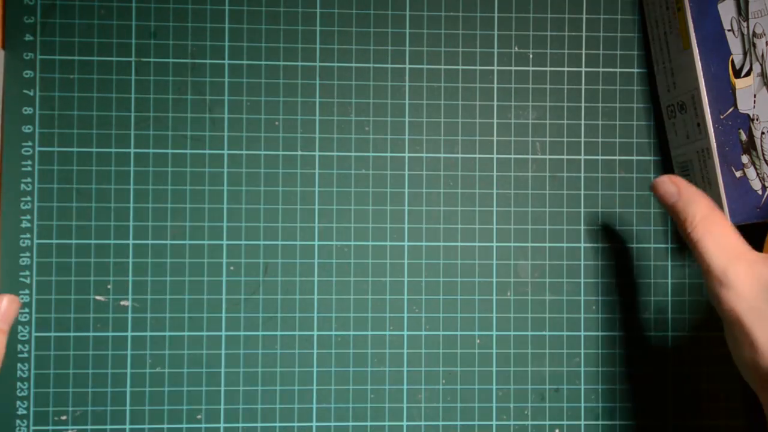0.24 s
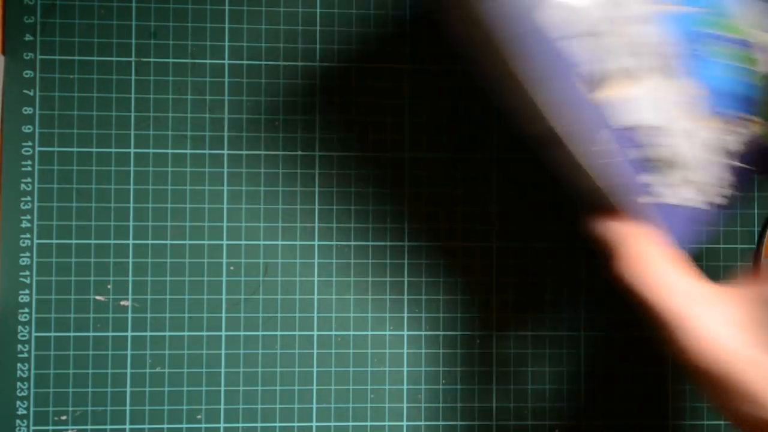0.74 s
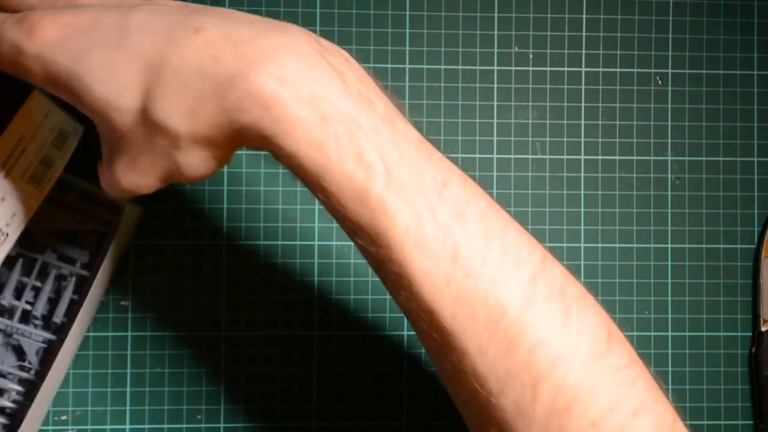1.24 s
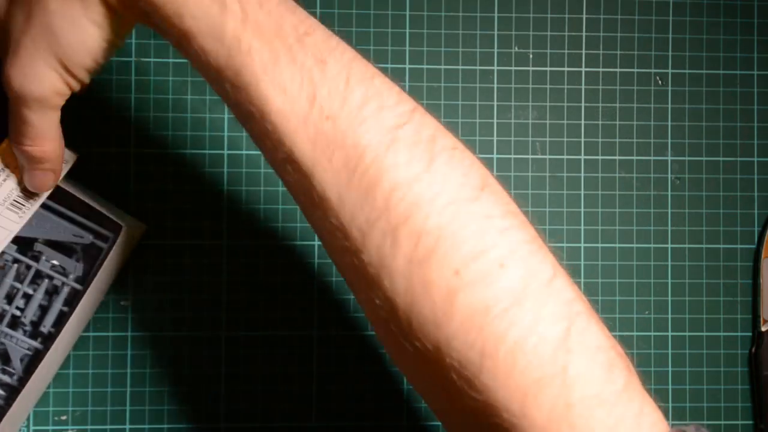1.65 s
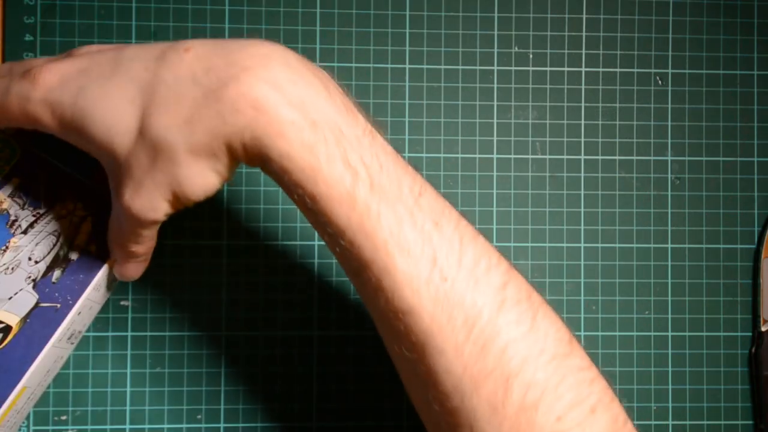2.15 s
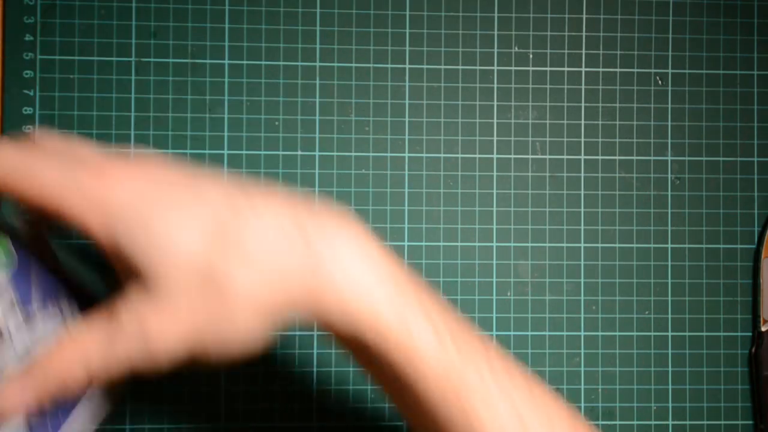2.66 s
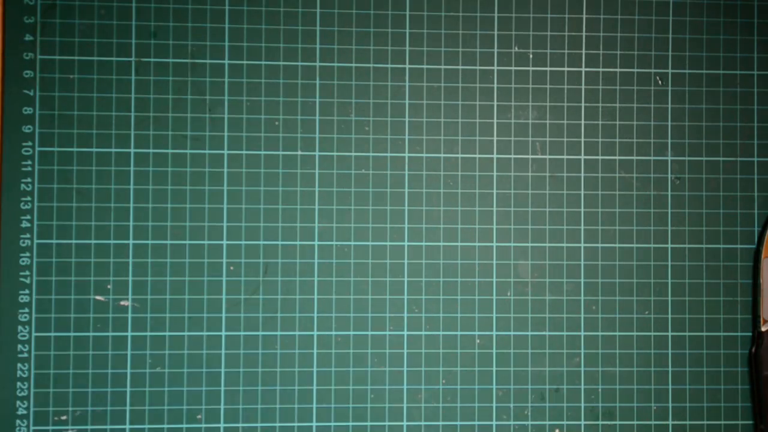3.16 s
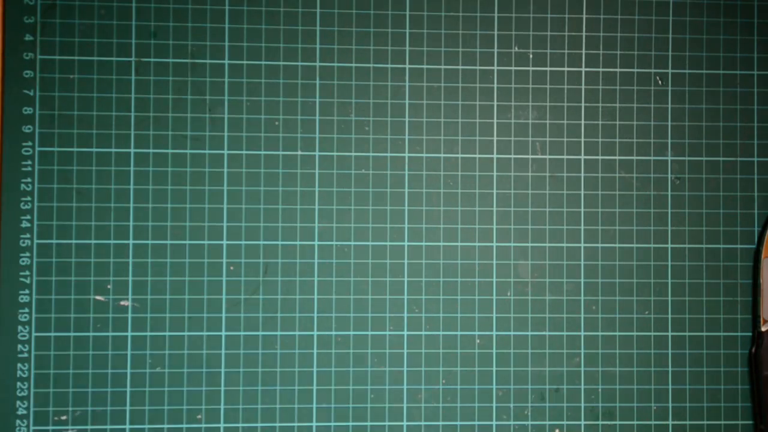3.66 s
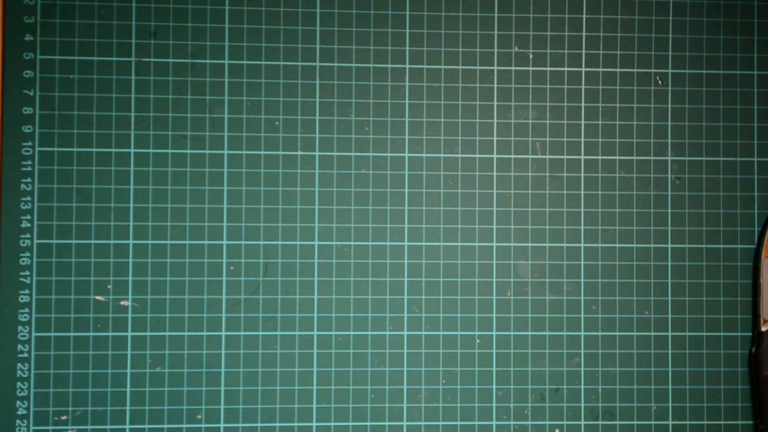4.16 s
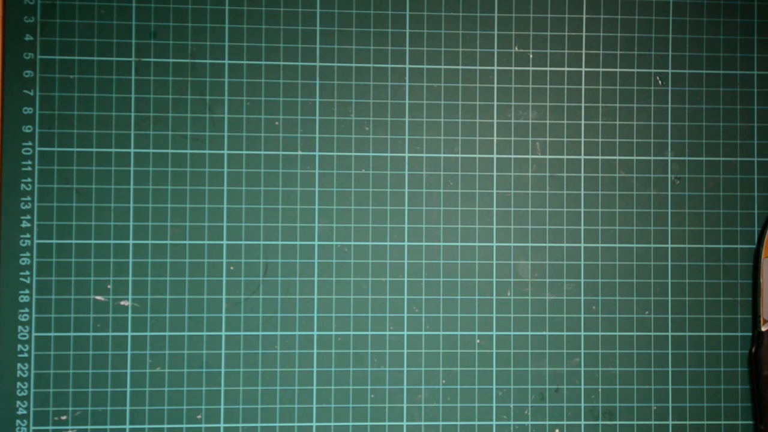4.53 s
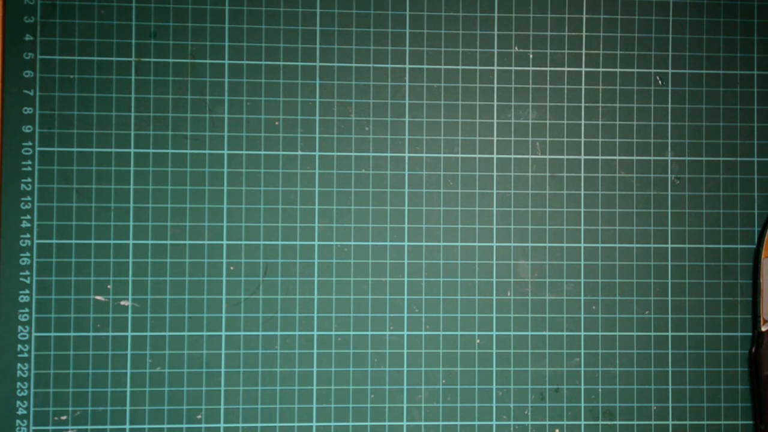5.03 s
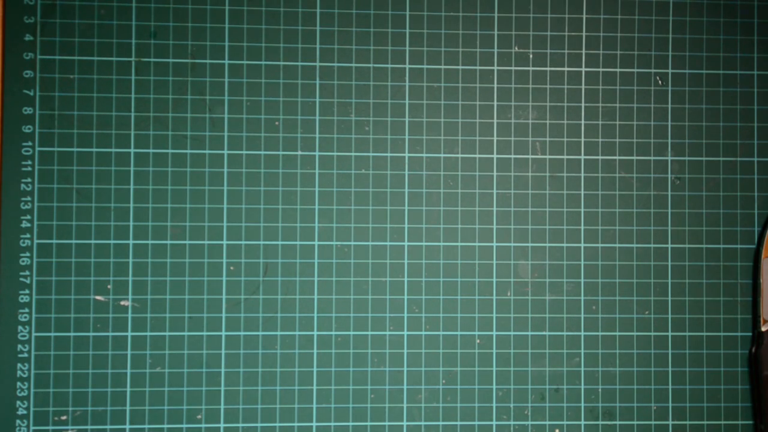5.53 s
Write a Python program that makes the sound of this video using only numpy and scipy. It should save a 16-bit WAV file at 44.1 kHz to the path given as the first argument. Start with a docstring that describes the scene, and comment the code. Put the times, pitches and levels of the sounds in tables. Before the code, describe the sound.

Very close, dry sound of hands moving a cardboard box of loose plastic pieces over a cutting mat. A short bright clatter comes first, then a click, then the loudest burst of hard cracks, boxy booms and rattling, slightly overloaded. Gentler card rubbing follows, another snap and scrape as the box leaves, then separate muffled shuffles and light knocks over faint room noise.

```python
"""At a table in a quiet room, a cardboard box of plastic model parts is lifted, opened, shut and put away.
Knocks: a short blow and a dying flurry of contacts make the box boom, its walls clack and the parts rattle.
Rubbing: dense random slips of card on card and mat drive the box, the fibres, the loose parts and the table.
Soft bumps ring the table top; a short room tail and steady noise lie below.
The close microphone notches the treble, and the hardest peaks clip."""
import sys
import numpy as np
from scipy import signal
from scipy.fft import rfft, irfft
from scipy.io import wavfile

SR = 44100
rng = np.random.default_rng(int(sys.argv[2]) if len(sys.argv) > 2 else 0)


def store_wav(level_fs):
    """Save 16-bit WAV to argv[1]."""
    pcm = np.round(np.clip(np.atleast_2d(level_fs), -1, 1) * 32767)
    wavfile.write(sys.argv[1], SR, pcm.T.astype(np.int16))


N = 254962

# Knocks and short scrapes, levels before each layer's own gain:
# [t/s, clack level/dB, boom re clack/dB, rattle re clack/dB, f of the piece hit/Hz, dying time/s]
KNOCK_EVENTS = [(0.002, -28, -6, 4, 7700, .005), (.019, -27, -8, 14.5, 4630, 0.0034),
                (0.028, -26, -11.5, 11.5, 8250, 0.0038), (0.05, -27.5, -13, 6.5, 5160, 0.01),
                (0.119, -31, -33, 9, 7600, 0.016), (.155, -25.5, -30, 4.5, 4630, 0.0094),
                (.17, -29.5, -30, 4, 7900, 0.011), (.2, -36, -8, -2, 10300, 0.0053),
                (.213, -28.5, -19, 1, 4970, 0.0088), (.239, -58, 7, 9, 8160, 0.0048),
                (.254, -36, -27, 7.5, 3040, 0.0054), (0.323, -62, -1, 16, 8450, 0.0054),
                (.349, -60, -5, 8, 6500, .006), (0.383, -45, 3, -10, 2290, 0.018),
                (.406, -35.5, 0.5, -8, 1360, 0.0091), (0.419, -32, -4, -6, 1030, 0.0061),
                (.55, -15, -20, -7.5, 2390, 0.0067), (0.66, -40, -30, -7.5, 1780, 0.015),
                (.796, -25, -9, -10.5, 1460, 0.011), (.874, -27, 0, -2.5, 2060, .0095),
                (.927, -24.5, -6.5, -1, 3900, 0.0037), (.9335, -5.5, -12.5, -4.5, 7300, 0.0057),
                (.942, -9, -0.8, -10, 1550, 0.0082), (0.977, -21.5, -10.5, 0, 1380, 0.0064),
                (1.069, -21.5, -20, -8.5, 3570, 0.017), (1.169, -3, 6.5, -9, 1257, 0.0084),
                (1.183, -10.5, 11.5, -4, 1460, 0.0065), (1.244, -19.5, -12, -6, 1160, 0.01),
                (1.284, -15.5, 4, -10, 1126, 0.0054), (1.309, -21, -16, -5.5, 2640, 0.0069),
                (1.334, -37.5, 25, -18, 1120, 0.0045), (1.355, -28, -16, -20, 2160, .011),
                (1.395, -33, 2, -8, 2400, .007), (1.479, -21, -0.5, -10, 2740, 0.0074),
                (1.559, -32.5, 9, -7.5, 1090, 0.022), (1.63, -27, 7.5, -7.5, 1620, 0.015),
                (1.653, -26.5, 10.5, -3, 1750, 0.0061), (1.746, -39, -14, -3.5, 2880, 0.0076),
                (1.844, -52, -2.5, -0.5, 2450, 0.016), (1.983, -37.5, 5, -11, 2230, 0.0064),
                (2.081, -32, 10.5, 0.5, 2150, 0.0077), (2.202, -33.5, 12, -5, 1470, 0.0066),
                (2.426, -45, 3, 1.5, 2600, 0.013), (2.495, -42.5, 8, -2, 2400, 0.011),
                (2.73, -43, -2, -10, 1210, 0.011), (2.753, -35, 8, -7, 1520, 0.0056),
                (2.785, -21, 0, -2, 1454, 0.018), (2.834, -27.5, 4, -1, 1180, 0.0098),
                (2.984, -12.5, 9, -9, 6260, 0.008), (3.005, -27, -2, 6.5, 7500, 0.011),
                (3.045, -42.5, 19.5, -9, 1580, 0.0049), (3.168, -30, 15, -9, 1100, 0.0069),
                (3.233, -32.5, 2, 1, 1130, 0.0078), (3.31, -19.5, 0, -4, 1147, 0.018),
                (3.453, -38.5, 6, -22, 2430, 0.0061), (3.533, -35, 14, -8, 2500, 0.0055),
                (3.752, -52.5, 19.5, -13, 1490, .005), (4.148, -34, -10, -4, 1470, 0.028),
                (4.357, -31.5, 17.5, 4.5, 7500, 0.014), (4.379, -20, 5.5, -8, 1420, 0.012),
                (4.464, -45, 22.5, 3, 1140, 0.012), (4.485, -33, 20.5, -5, 1510, .009),
                (4.519, -28.5, 10.5, -12.5, 1970, 0.023), (4.554, -35.5, 7.5, -15, 1510, 0.024),
                (4.929, -51.5, -30, 2.5, 4400, 0.017), (4.982, -45.5, -18, -22, 1540, 0.0092),
                (5.007, -48.5, -3, -1.5, 7540, .005), (5.066, -47.5, -1, -3.5, 2260, 0.015),
                (5.469, -53, 12.5, 10, 7900, .015), (5.492, -35, 12.5, -2, 1940, 0.0083),
                (5.504, -38, 11, -14, 2100, .018), (5.571, -35.5, 8.5, -2.5, 1250, 0.022),
                (5.657, -44, 17, 3.5, 1250, 0.011)]
# Colour of rubbed fibres and rattling parts: [f/Hz, relative level per Hz/dB]
RUSTLE_COLOUR = [(2200, -22.5), (3300, -0.5), (4830, 0), (6300, -2), (8400, -4), (10000, -14.5),
                 (12000, -40.5), (15500, -13.5)]
# Colour of the thud in the table: [f/Hz, relative level per Hz/dB]
TABLE_COLOUR = [(20, -28.5), (60, -30.5), (95, -15), (125, -8), (200, -11.5), (260, -5.5), (320, 1),
                (370, -6), (450, -3), (620, -13), (1060, -66.5)]
LID_SHUT_S = 2.7


def from_db(db):
    """Decibels to gain."""
    return 10 ** (np.asarray(db) / 20)


def rms_one(x):
    """Scale to unit rms."""
    return x / np.sqrt(np.mean(x ** 2) + 1e-20)


def resonate(x, hz, width_hz):
    """Two-pole resonance with gain 1 near its peak; a narrow width rings longer."""
    r = np.exp(-np.pi * width_hz / SR)
    feedback = [1, -2 * r * np.cos(2 * np.pi * hz / SR), r * r]
    return signal.lfilter([(1 - r * r) / 2, 0, (r * r - 1) / 2], feedback, x)


def mode_kernel(modes):
    """Impulse response of parallel modes with alternating signs; unit energy."""
    click = np.eye(1, 4096)[0]
    h = np.zeros(4096)
    for k, (hz, width_hz, db) in enumerate(modes):
        h += (-1) ** k * from_db(db) * resonate(click, hz, width_hz)
    return h / np.linalg.norm(h)


def colour_kernel(spectrum):
    """Causal (minimum-phase) impulse response of a smooth spectrum; unit energy."""
    hz, db = np.transpose(spectrum)
    bins_hz = np.fft.rfftfreq(8192, 1 / SR)
    log_gain = np.interp(np.log(bins_hz + 1), np.log(hz), db) * np.log(10) / 20
    cepstrum = irfft(log_gain)
    # fold the second half onto the first: all energy comes as early as it can
    cepstrum[1:4096] *= 2
    cepstrum[4097:] = 0
    h = irfft(np.exp(rfft(cepstrum)))[:4096]
    return h / np.linalg.norm(h)


def through(x, kernel):
    """Convolve, keeping the length."""
    return signal.fftconvolve(x, kernel)[:len(x)]


def grains(per_s, spread_db, size):
    """Random micro-contacts of uneven strength and either sign; unit rms."""
    strength_db = spread_db * np.minimum(rng.exponential(1, size), 4)
    strength = from_db(strength_db) * rng.choice([-1, 1], size)
    return rms_one(strength * (rng.random(size) < per_s / SR))


def flutter(rate_hz, depth_db):
    """Uneven grip: a random gain that wanders at about rate_hz, depth_db being its rms."""
    r = np.exp(-2 * np.pi * rate_hz / SR)
    wander = signal.lfilter([1], [1, -2 * r, r * r], rng.standard_normal(N + SR))[SR:]
    return from_db(depth_db * rms_one(wander))


def box_air(force):
    """The air in the box rings in its own modes, lower once the lid is down."""
    # Air modes, lid raised: [f/Hz, width/Hz, relative level/dB]
    open_modes = [(504, 68, -13.5), (673.6, 85.5, 0.5), (808, 74, -1), (889, 90, -3), (945, 74, -2),
                  (1088, 150, -10.5)]
    # Air modes, lid down: [f/Hz, width/Hz, relative level/dB]
    shut_modes = [(495, 42, -2.5), (561, 49.4, 4), (599, 70, 6), (710, 77, 0), (770, 94, -1.5),
                  (953, 67, -1), (1134, 96, -8)]
    shut = np.arange(N) > LID_SHUT_S * SR
    return through(force * ~shut, mode_kernel(open_modes)) + through(force * shut, mode_kernel(shut_modes))


def walls(force):
    """Card walls: a few modes over a broad wash; the modes shift once the lid is down."""
    # Wall modes, lid raised: [f/Hz, width/Hz, relative level/dB]
    open_modes = [(1387, 140, 2), (1622, 62, 8.5), (1826, 240, 2.5), (2196, 100, 11), (2425, 160, -6.5),
                  (2850, 33, -5), (3620, 57, -9.5)]
    # Wall modes, lid down: [f/Hz, width/Hz, relative level/dB]
    shut_modes = [(1484, 150, 4), (1971, 60, 7), (2635, 41, -2.5), (2920, 21, -18), (3464, 166, -2.5),
                  (4610, 590, -8.5)]
    # Wash between the wall modes: [f/Hz, relative level per Hz/dB]
    wash_colour = [(700, -29), (1100, -3), (1600, -5.5), (2400, 9.5), (3300, -1.5), (4500, -34.5)]
    shut = np.arange(N) > LID_SHUT_S * SR
    wash = colour_kernel(wash_colour)
    lid_raised = through(force * ~shut, mode_kernel(open_modes) + wash)
    lid_down = through(force * shut, mode_kernel(shut_modes) + wash)
    return lid_raised + lid_down


def knocks(rise_s=0.0028, blow_db=17, piece_width_hz=120, contact_s=0.0019):
    """A blow sets the modes ringing at once, then contacts die away; the piece hit adds its own pitch."""
    size = 5000   # samples per knock
    blow_most, blow_loss_per_s = 0.64, 16.1   # share landing at once; the longer it drags, the smaller
    rise_share = 0.23   # a dragging knock swells more slowly: extra rise time per dying time
    small_piece_hz = 3550   # pieces pitched above this are loose parts, below it bits of card
    base_rattle_hz, rattle_oct_per_db = 5960, 0.06   # when card is hit: more rattle, higher ring
    t = np.arange(size) / SR
    boom, clack, rattle, own = np.zeros((4, N + size))
    for s, clack_db, boom_db, rattle_db, piece_hz, dying_s in KNOCK_EVENTS:
        start = round(s * SR)
        at = slice(start, start + size)
        blow = np.clip(blow_most - blow_loss_per_s * dying_s, 0, 1)
        small = piece_hz > small_piece_hz
        rattle_hz = piece_hz if small else base_rattle_hz * 2 ** (rattle_oct_per_db * rattle_db)

        swell = 1 - np.exp(-t / (rise_s + rise_share * dying_s))
        flurry = (1 - blow) * swell * np.exp(-t / np.clip(dying_s, .002, .04))
        low, mid, high = (flurry * grains(rate, 1.3, size=size) for rate in (6000., 8000., 12000.))
        low[0] += blow * from_db(blow_db) * rng.choice([-1, 1])   # one push for the air in the box
        # stiff parts hear the blow as a crack
        crack = blow * t / contact_s * np.exp(-t / contact_s) * rng.standard_normal((2, size))
        mid = mid + from_db(6) * crack[0]
        high = high + from_db(0.5) * crack[1]

        boom[at] += from_db(clack_db + boom_db + 6.5) * low
        clack[at] += from_db(clack_db + 0.8) * mid
        rattle[at] += from_db(clack_db + rattle_db + 8.5) * high
        if not small:
            own[at] += from_db(clack_db + 25.5) * resonate(mid, piece_hz, piece_width_hz)
        rattle_width_hz = 0.58 * rattle_hz
        ring = resonate(resonate(high, rattle_hz, rattle_width_hz), rattle_hz, rattle_width_hz)
        own[at] += from_db(clack_db + rattle_db + 9.0) * ring
    boom, clack, rattle, own = boom[:N], clack[:N], rattle[:N], own[:N]
    thud = from_db(-17.0) * through(boom, colour_kernel(TABLE_COLOUR))   # the table feels every push
    return thud + box_air(boom) + walls(clack) + through(rattle, colour_kernel(RUSTLE_COLOUR)) + own


def settling():
    """Gain of the contents sliding on after every knock; both boom and clack shake them."""
    settle_db, rise_s, dying_s = -18, .015, 0.025
    t = np.arange(SR // 2) / SR
    hits = np.zeros(N)
    for s, clack_db, boom_db, *_ in KNOCK_EVENTS:
        hits[round(s * SR)] = np.hypot(from_db(clack_db), from_db(clack_db + boom_db))
    slide = (1 - np.exp(-t / rise_s)) * np.exp(-t / dying_s)
    return from_db(settle_db) * through(hits, slide)


def ticks():
    """Lone contacts at random moments, each a tiny dying noise burst; unit rms."""
    per_s, dying_s = 45., 0.0043
    t = np.arange(SR // 20) / SR
    envelope = through(grains(per_s, 3.0, size=N), np.exp(-t / dying_s))
    return rms_one(envelope * rng.standard_normal(N))


def loose_parts(force, width=0.028, swell_db=8.5):
    """Rubbing shakes small pieces; each pitch swells and fades as a piece is touched or let go."""
    pitches = np.geomspace(1300, 8200, num=12)
    return sum(flutter(rate_hz=3.7, depth_db=swell_db) * resonate(force, hz, width * hz) for hz in pitches)


def rubbing():
    """Dense slips under the hands drive air, walls, fibres, parts and table; the grip flutters."""
    # Hand pressure, one curve per burst: letting go of the parts, gripping the box, swinging it over and
    # raising the lid, lowering it, pressing it shut and carrying it off, sliding it into place,
    # a light brush, a last push: [t/s, pressure level/dB, brightness/dB (fibres up, box air down)]
    bursts = [
        [(0, -33.5, 12.5), (.08, -43.5, 4), (.27, -52.5, 8), (.3, -60, -1), (.37, -72, -1)],
        [(.44, -53, -2), (.54, -52.5, -2), (.7, -55.5, 4.5), (.75, -52.5, 2)],
        [(.79, -44, 2.5), (.9, -32, 0.5), (1.12, -40.5, 3), (1.15, -28.5, -3), (1.4, -37.5, -5),
         (1.47, -42.5, 0), (1.6, -36.5, -3), (1.62, -46, -6), (1.674, -34, -5.5), (1.695, -47, -7.5),
         (1.78, -61.5, -5.5), (1.94, -70, -4.5)],
        [(1.98, -65, -6), (2.0, -40, -2), (2.16, -36.5, -3.5), (2.175, -51, -9.5), (2.29, -53, -4),
         (2.4, -50.5, -6), (2.65, -55, 1), (2.72, -78.5, -7)],
        [(2.77, -44, -2.5), (2.83, -38, 0.5), (3.03, -31, -6.5), (3.06, -43.5, -7), (3.26, -40, -2),
         (3.41, -48.5, -5), (3.58, -51.5, 1), (3.78, -51.5, -4.5), (3.95, -65, -1.5)],
        [(4.098, -52.5, 0), (4.123, -34, 0.5), (4.17, -32, -4), (4.345, -38.5, -1), (4.41, -32, -3.5),
         (4.5, -36, -4), (4.6, -38.5, -4), (4.66, -51, -4.5), (4.72, -62, -9)],
        [(4.83, -60, 1.5), (4.91, -68.5, 4.5), (5.05, -60.5, -4), (5.16, -48.5, 5), (5.32, -49, 2.5),
         (5.4, -66, -1)],
        [(5.46, -67, 10), (5.53, -40.5, -2.5), (5.56, -40.5, -9.5), (5.6, -33.5, -8), (5.69, -43, -4.5),
         (5.78, -48, -4.5)],
    ]
    t = np.arange(N) / SR
    s, level_db, bright_db = np.concatenate(bursts).T
    level_db = np.interp(t, s, level_db)
    bright_db = np.interp(t, s, bright_db)

    push = np.hypot(from_db(level_db), settling())
    air = push * from_db(-2.5 - bright_db)
    wall = push * from_db(1.5)
    fine = push * from_db(-1.5 + bright_db)
    thud = np.hypot(from_db(-11) * air, from_db(-63))   # pushes over a steady rumble in the table

    # slow pull, quick stick and slip
    grip = flutter(rate_hz=9.3, depth_db=1.0) * flutter(rate_hz=18, depth_db=1.5)
    tick = from_db(-8) * ticks()
    slips = fine * (grip * grains(6000., 1.8, size=N) + tick)
    air_slips = air * grip * flutter(rate_hz=11, depth_db=2.5) * grains(1500., 2.2, size=N)
    wall_slips = wall * (grip * grains(4000., 2.15, size=N) + from_db(1.5) * tick)

    out = box_air(air_slips)
    out += walls(from_db(-5.5) * wall_slips)
    out += from_db(-2.0) * through(slips, colour_kernel(RUSTLE_COLOUR))
    out += from_db(-8) * loose_parts(slips)
    return out + through(thud * rng.standard_normal(N), colour_kernel(TABLE_COLOUR))


def room_noise():
    """Steady coloured noise of the quiet room."""
    # Colour of the room noise: [f/Hz, relative level per Hz/dB]
    noise_colour = [(15, -21.5), (25, -12.5), (313, -2), (388, -6), (782, -5), (1450, -7.5), (4490, -18.5),
                    (5720, -17.5), (7690, -17.5), (13900, -33.5), (15500, -34)]
    noise = through(rng.standard_normal(N + SR), colour_kernel(noise_colour))[SR:]
    return from_db(-56.5) * noise


def room(x):
    """A short diffuse tail after the first wall echo, duller than the direct sound."""
    t60_s, tail_db, wall_cut_hz = 0.12, -14.5, 5000
    t = np.arange(SR // 2) / SR
    tail = rng.standard_normal(len(t)) * from_db(-60 * t / t60_s) * (t > .006)
    tail = signal.sosfilt(signal.butter(1, wall_cut_hz, fs=SR, output="sos"), tail)
    return from_db(tail_db) * through(x, tail / np.linalg.norm(tail))


def bumps():
    """The box or a wrist lands softly: rounded pushes ring the lowest mode of the table top."""
    # Soft landings: [t/s, push level/dB]
    landings = [(1.172, -20), (1.23, -23), (3.03, -30), (3.51, -32), (3.546, -29), (3.7, -42), (3.827, -29),
                (4.366, -37), (5.581, -28)]
    push_s, table_top_hz, table_top_width_hz = .004, 122, 26
    t = np.arange(SR // 10) / SR
    hits = np.zeros(N)
    for s, db in landings:
        hits[round(s * SR)] = from_db(db)
    push = t / push_s * np.exp(1 - t / push_s)
    return resonate(through(hits, push), table_top_hz, table_top_width_hz)


def scene():
    """Box and parts, bright in the open and duller once put away, with room tail and noise."""
    bare_until_s, bare_air_db, bare_air_hz = .37, -0.5, 9300   # parts handled in the open: more top
    put_away_s, away_cut_hz = 3.95, 10900   # box off to the side: duller at the microphone
    t = np.arange(N) / SR
    near = knocks() + rubbing() + bumps()
    dull = signal.sosfilt(signal.butter(1, away_cut_hz, fs=SR, output="sos"), near)
    top = signal.sosfilt(signal.butter(2, bare_air_hz, "high", fs=SR, output="sos"), near)
    near = np.where(t > put_away_s, dull, near)
    near = near + from_db(bare_air_db) * top * (t < bare_until_s)
    return (near + room(near) + room_noise())[None]


def record(dry):
    """The housing takes two notches out of the treble, peaks are clipped hard, the top is cut."""
    # Cavities of the microphone housing: [f/Hz, width/Hz, depth 0-1]
    notches = [(5690, 510, 1), (6950, 130, 0.9)]
    x = dry
    for hz, width_hz, depth in notches:
        x = x - depth * resonate(x, hz, width_hz)
    x = np.clip(x, -1, 1)   # overload
    return signal.sosfilt(signal.cheby2(12, 60, 15650, fs=SR, output="sos"), x)   # stopband from 15650 Hz


dry = scene()
out = record(dry)
store_wav(out)
```